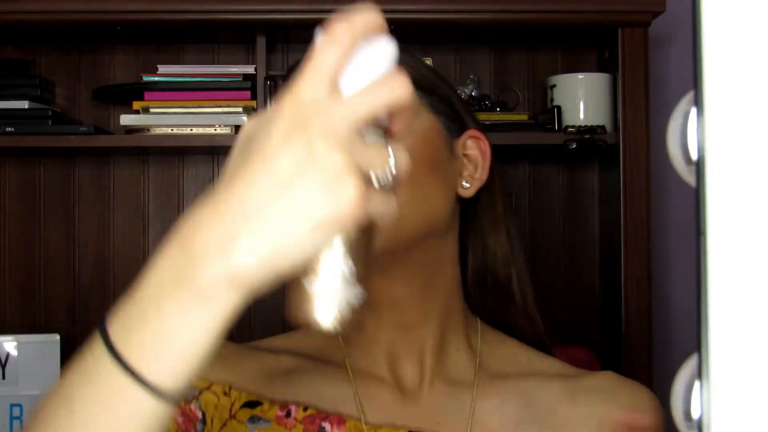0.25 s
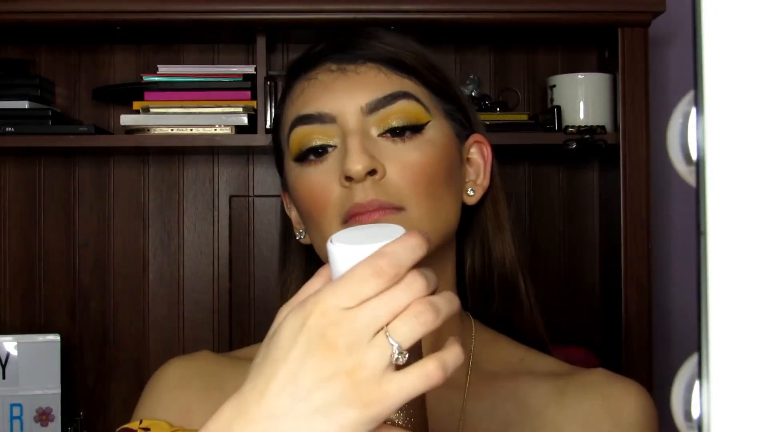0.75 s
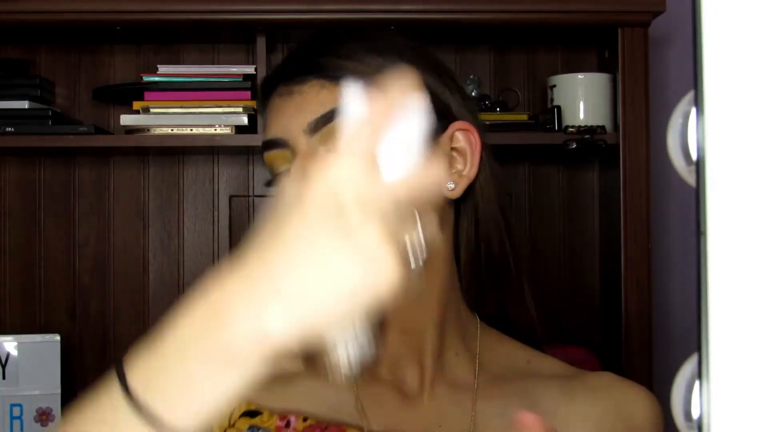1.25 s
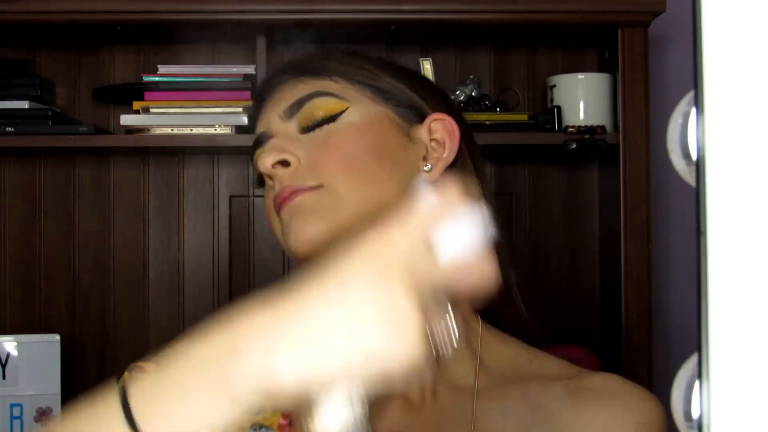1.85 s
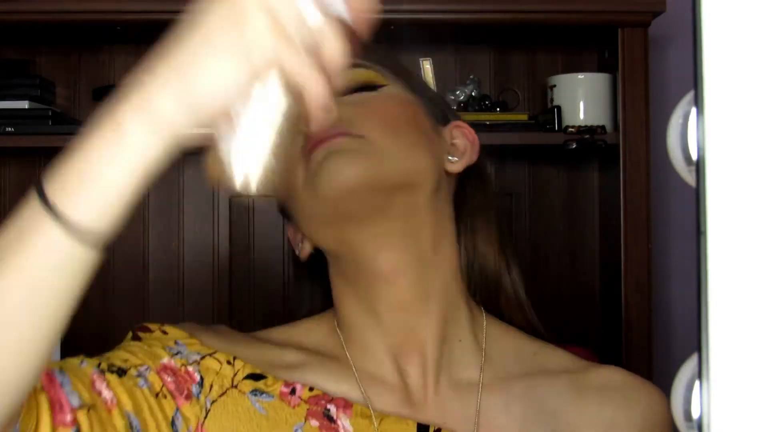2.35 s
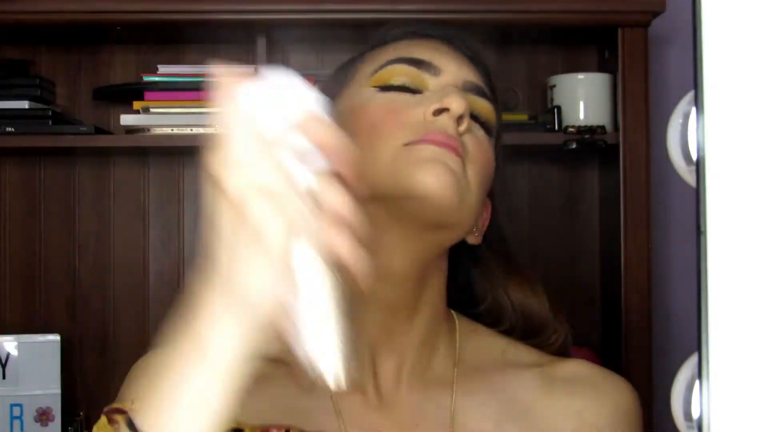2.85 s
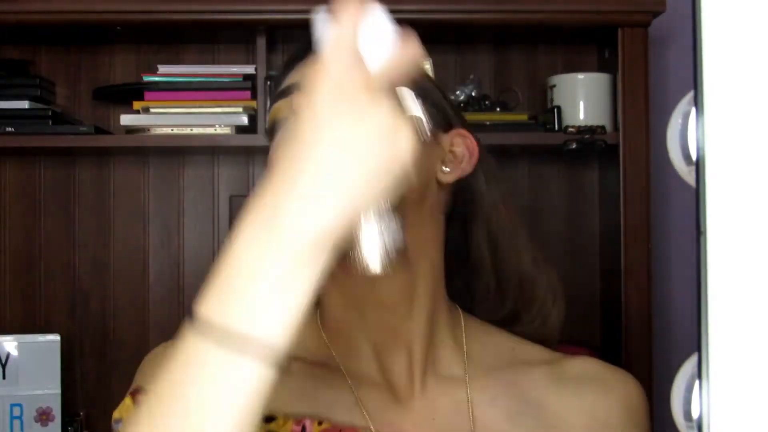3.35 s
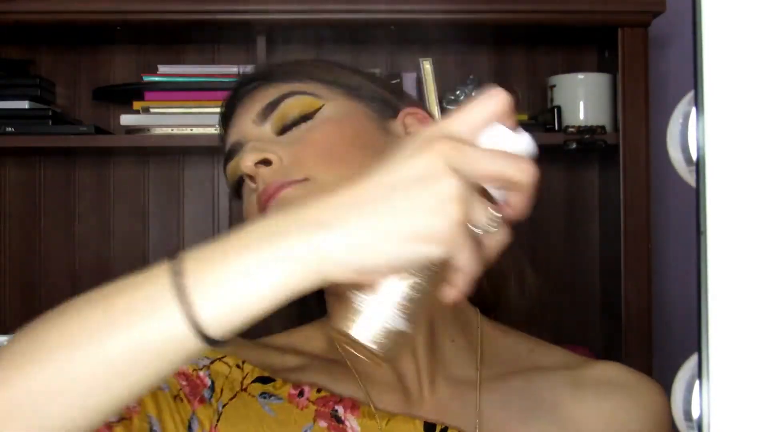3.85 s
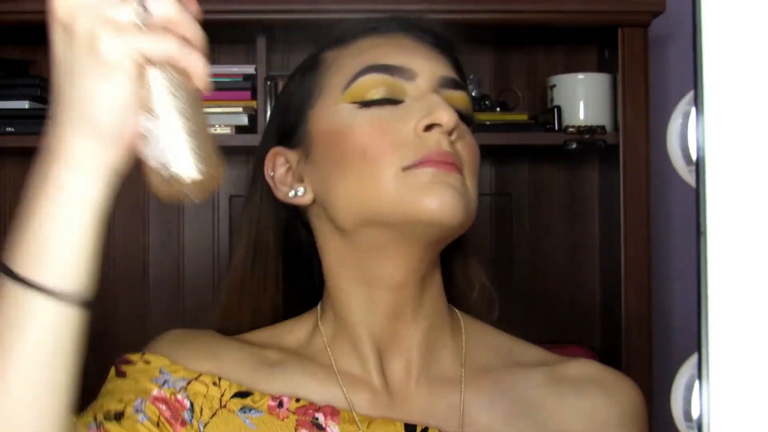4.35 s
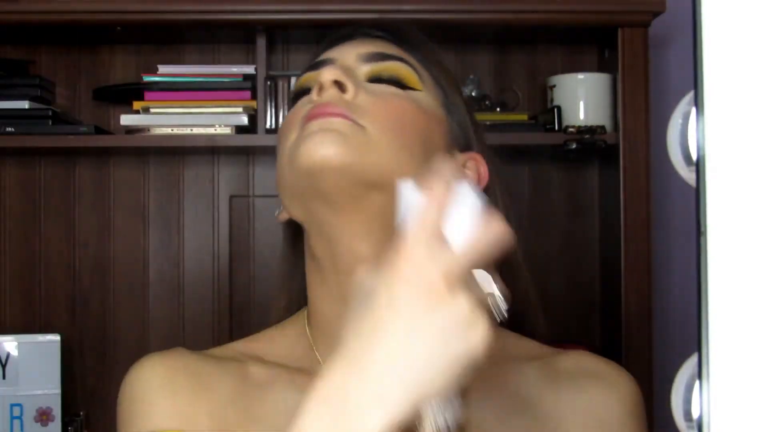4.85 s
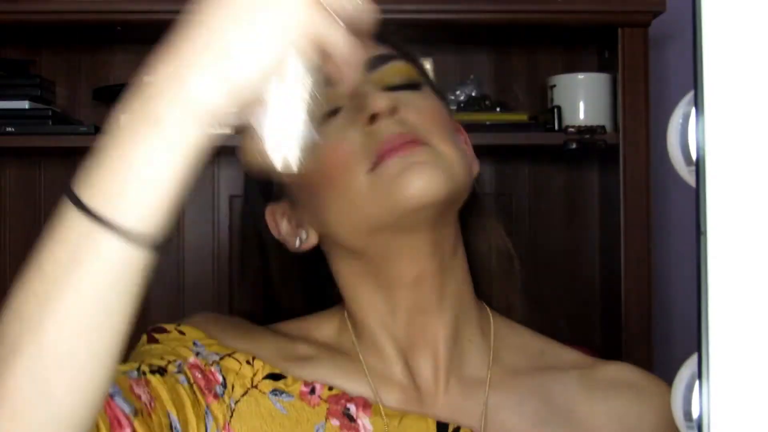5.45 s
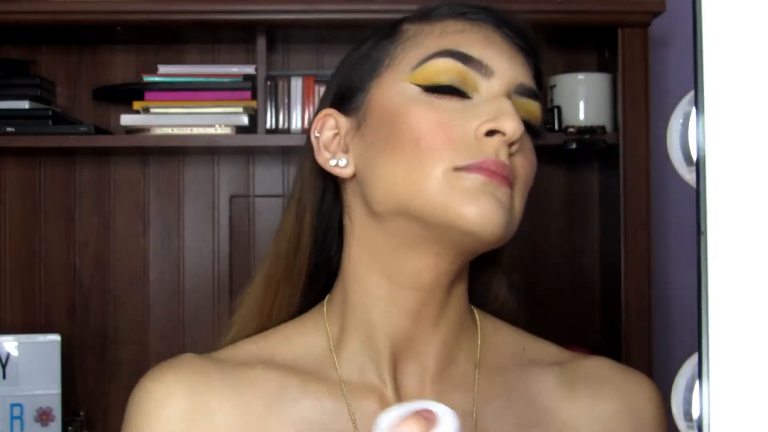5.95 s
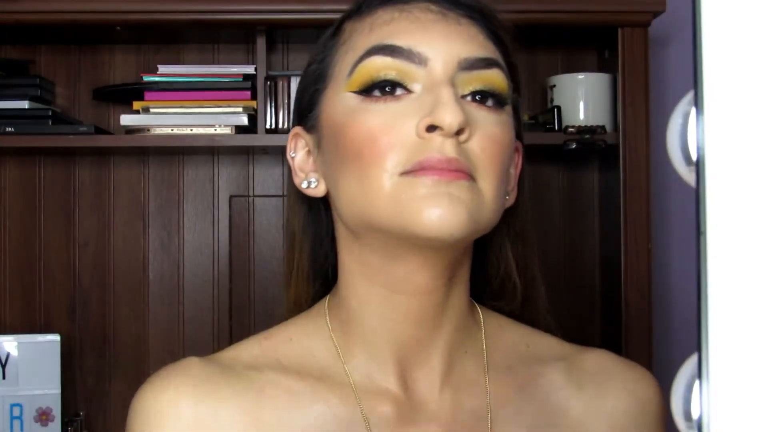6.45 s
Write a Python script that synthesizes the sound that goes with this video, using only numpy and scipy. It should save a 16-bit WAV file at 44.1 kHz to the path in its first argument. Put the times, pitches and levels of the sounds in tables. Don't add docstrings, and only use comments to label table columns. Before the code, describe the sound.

Close stereo pickup of a hand pump bottle indoors. First a sharp cap pop with a brief plastic chatter, then a rapid regular series of crisp misting bursts, each with a hollow knock before it and a softer airy draw after it. Some presses spit, judder or give a tiny rising whistle. It ends with a cap snap and light fumbling, over soft room rumble, preamp hiss and scratchy camera motor ticks.

```python
import sys
import numpy as np
from scipy import signal
from scipy.fft import rfft, irfft, next_fast_len
from scipy.io import wavfile

SR = 44100
rng = np.random.default_rng(int(sys.argv[2]) if len(sys.argv) > 2 else 0)


def unload_audio(sound):
    columns = np.transpose(np.atleast_2d(sound))
    steps = np.round(np.clip(columns, -1, 1) * 32767)
    wavfile.write(sys.argv[1], SR, steps.astype(np.int16))


def linear_from_db(decibels):
    return 10 ** (np.asarray(decibels, float) / 20)


N = 294915


def rms_one(x):
    return x / np.sqrt(np.mean(x ** 2) + 1e-20)


def band(x, low_hz, high_hz, order=2):
    return signal.sosfilt(signal.butter(order, [low_hz, high_hz], "band", fs=SR, output="sos"), x)


def coloured(x, points):
    hz = np.maximum(np.fft.rfftfreq(x.shape[-1], 1 / SR), 1)
    points = np.array(points)
    gain_db = np.interp(np.log(hz), np.log(points[:, 0]), points[:, 1])
    return irfft(rfft(x) * linear_from_db(gain_db), x.shape[-1])


def noise(points):
    return rms_one(coloured(rng.standard_normal(next_fast_len(N)), points)[:N])


def flutter(rate_hz):
    lowpass = signal.butter(2, rate_hz, fs=SR, output="sos")
    return rms_one(signal.sosfilt(lowpass, rng.standard_normal(N)))


def along(tables, column):
    rows = np.concatenate(tables)
    return np.interp(np.arange(N) / SR, rows[:, 0], rows[:, column])


def bursts(tables, fade_s=0.0027):
    rows = []
    for table in tables:
        rows.append((table[0][0] - fade_s, -110))
        rows += [row[:2] for row in table]
        rows.append((table[-1][0] + 6 * fade_s, -110))
    return linear_from_db(along([rows], column=1))


# pitch_hz, level_db (per Hz)
AIR_SUM = [(15, -45), (25, -10), (110, -2), (173, -3.5), (204, 0.5), (349, -7), (410, -0.5), (445, -9.5),
           (523, 1.5), (614, -7), (666, -21), (997, -12), (1270, -16.5), (3700, -27), (8350, -27.5),
           (15500, -33)]
# pitch_hz, level_db (per Hz)
AIR_DIFFERENCE = [(15, -51), (25, -2), (59, -4.5), (96, 1), (183, -0.5), (359, -4), (410, -9), (457, -4.5),
                  (703, -24), (945, -14.5), (1240, -24.5), (12800, -44.5), (15500, -38)]


def room_air():
    mid = linear_from_db(-48.5 + 1.15 * flutter(2.5)) * noise(AIR_SUM)
    side = linear_from_db(-41 + 0.64 * flutter(8.1)) * noise(AIR_DIFFERENCE)
    return mid, side


# peak_s, level_db, pitch_hz, half_length_s
GUSTS = [
    (2.55, -56, 100, .04),
    (4.68, -63, 45, .05),
    (5.66, -59, 50, .04),
    (5.78, -60, 55, .04),
    (5.3, -57, 300, .2),
]


def gusts():
    t, out = np.arange(N) / SR, np.zeros(N)
    for s, db, hz, half_s in GUSTS:
        lump = np.exp(-((t - s) / half_s) ** 2)
        out += linear_from_db(db) * lump * rms_one(band(rng.standard_normal(N), hz / 1.3, hz * 1.3))
    return out


# time_s, level_db
MOTOR_RUNS = [
    [(0.0, -57), (0.28, -75), (0.4, -71)],
    [(0.42, -62), (0.54, -71), (0.7, -82)],
    [(0.8, -57), (0.928, -57), (1.226, -60), (1.404, -55.5), (1.5, -78)],
    [(5.95, -69), (6.1, -55.5), (6.26, -76)],
    [(6.42, -63), (6.68, -72)],
]
# start_s, peak_db
JOLTS = [(0.008, -40), (0.018, -37), (0.056, -41), (0.075, -42), (0.09, -44), (0.108, -45), (0.46, -42),
         (0.466, -45.5), (0.5097, -48), (0.536, -38.5), (0.574, -39.5), (0.601, -39), (0.641, -40),
         (0.67, -36.5), (0.942, -56), (0.9562, -48), (0.975, -43), (0.984, -40), (1.1223, -44),
         (1.1444, -52), (1.1898, -43.5), (1.2082, -41), (1.257, -46), (1.276, -44), (1.3891, -40.5),
         (1.408, -42), (2.744, -32), (6.143, -38), (6.541, -38), (6.663, -30.5)]
# pitch_hz, width_hz, level_db
CAMERA_BODY = [(897, 110, -6), (1250, 54, 4.5), (1423, 110, 4), (1900, 310, -2.5), (2520, 320, -3.5)]


def motor():
    step_hz = 58.7
    turn = step_hz * np.arange(N) / SR
    strength = linear_from_db(rng.normal(0, 2.5, N // 100)[turn.astype(int)])
    steps = 0.24 + 2.16 * strength * np.exp(-5.0 * (turn % 1))
    drive = linear_from_db(0.5) * bursts(MOTOR_RUNS, fade_s=0.0046) * steps
    for s, db in JOLTS:
        drive[round(s * SR):][:600] += linear_from_db(db - 5.0) * np.exp(-np.arange(600) / SR / 0.0042)
    scratch, body = rng.standard_normal(N), 0
    both = np.array([scratch, scratch * drive])
    for k, (hz, width, db) in enumerate(CAMERA_BODY):
        body = body + (-1) ** k * linear_from_db(db) * band(both, hz - width / 2, hz + width / 2)
    return band(body[1], 750, 3400, order=4) / np.std(body[0])


# pitch_hz, t60_s
ROOM_T60 = [(300, 0.29), (1000, 0.26), (4000, 0.25), (12000, 0.15)]
# delay_s, level_db
ECHOES = [
    (.0057, -8),
    (.0085, -9),
    (0.014, -13),
    (.022, -14),
]


def room(x, echo_db, tail_db, count=3):
    t, out = np.arange(SR // 4) / SR, 0
    place = np.arange(N) // 3500 % count
    edges_hz = [60, 550, 2000, 7000, 18000]
    smear_s, echo_low_hz = 0.0018, 420
    for k in range(count):
        white, tail = rng.standard_normal((4, len(t))), 0
        for w, low, high, (hz, t60) in zip(white, edges_hz, edges_hz[1:], ROOM_T60):
            tail = tail + band(w, low, high) * linear_from_db(-60 * t / t60)
        onset = np.clip((t - .003) / 0.0084, 0, 1)
        tail = linear_from_db(tail_db) * tail / np.sqrt(np.sum(tail ** 2)) * onset
        for s, db in ECHOES:
            smear = rng.standard_normal(300) * np.exp(-t[:300] / smear_s)
            smear = band(smear, echo_low_hz, 22000)
            tail[round(s * SR):][:300] += linear_from_db(db + echo_db) * smear / np.sqrt(np.sum(smear ** 2))
        out = out + signal.oaconvolve(x * (place == k), tail)[:N]
    return out


SOFT_S, HARD_S = .0007, .0001


def add_ring(out, s, db, hz, t60, contact_s=HARD_S):
    t = np.arange(min(int(t60 * SR) + 8, N - round(s * SR))) / SR
    level = linear_from_db(db - 60 * (t / t60) ** 1.405) * np.minimum(t / contact_s, 1)
    out[round(s * SR):][:len(t)] += level * np.sin(2 * np.pi * hz * t)


def crack(colour, spread_s):
    pulse = np.zeros(2048)
    pulse[0] = 1
    cepstrum = irfft(np.log(np.abs(rfft(coloured(pulse, colour))) + 1e-6))
    cepstrum[1:1024] *= 2
    cepstrum[1025:] = 0
    lag_s = spread_s * np.interp(np.arange(1025), np.geomspace(20, 1024, 22), rng.random(22))
    pulse = irfft(np.exp(rfft(cepstrum) - 2j * np.pi * np.cumsum(lag_s) * SR / 2048))
    return pulse / np.abs(pulse).max()


# start_s, peak_db
SNAPS = [
    (0.7114, -17),
    (6.2719, -14.5),
]
# pitch_hz, level_db (per Hz)
CAP_OFF = [(500, -42.5), (700, -7), (900, 11), (1400, 0), (1700, -7), (2150, 3.5), (2700, -5), (3200, 3),
           (4000, -18), (4600, -9), (5600, -22), (8700, -10), (10500, -14), (15500, -18)]
# pitch_hz, level_db (per Hz)
CAP_ON = [(500, -45), (780, -34), (1010, -4), (1200, -7), (1520, 6), (1900, -8), (2300, -11.5), (2900, -3),
          (3700, -12), (4500, -13), (7000, -11), (9800, -11), (12000, -22), (15500, -21)]
# pitch_hz, width_hz, level_db
CHATTER_OFF = [(880, 25, -6), (1070, 41, 1.5), (1590, 73, 1), (2340, 91, -9), (3040, 110, -3.5),
               (3840, 84, 0), (6500, 140, -6), (8800, 140, 0.5), (9800, 90, -9)]
# pitch_hz, width_hz, level_db
CHATTER_ON = [(1000, 60, -11), (1320, 69, -3.5), (1580, 65, -4), (2130, 140, -7.5), (2930, 140, -9),
              (3700, 77, -4.5), (5950, 170, -15), (7040, 150, -19), (9360, 150, -6), (10270, 120, -8)]
# pitch_hz, level_db (re the snap), t60_s
STRUCK_OFF = [(860, -16.5, 0.053), (1700, -12, .02), (2150, 3.5, 0.0066), (3120, -13, .006),
              (4400, -7, .006)]
# pitch_hz, level_db (re the snap), t60_s
STRUCK_ON = [(1000, -16.5, 0.018), (1250, -9, 0.018), (1525, -8, 0.048), (2000, -13, .015),
             (3030, -18, 0.0066), (5170, -10, 0.0067)]


def cap():
    out, t = np.zeros(N), np.arange(SR // 4) / SR
    chatter_db, chatter_t60_s, spread = -17.5, 0.095, 4
    sides = zip(SNAPS, (CAP_OFF, CAP_ON), (CHATTER_OFF, CHATTER_ON), (STRUCK_OFF, STRUCK_ON))
    for (s, db), colour, modes, struck in sides:
        for hz, mode_db, t60 in struck:
            add_ring(out, s + 0.00087, db + mode_db, hz, t60)
        for lag_s, part_db in ((.0006, 2), (.0024, -0.5), (.005, -9.5)):
            out[round((s + lag_s) * SR):][:2048] += linear_from_db(db + part_db) * crack(colour, spread_s=.0022)
        chatter, rings = rng.standard_normal(len(t)), 0
        top_db = max(row[2] for row in modes)
        for hz, width, mode_db in modes:
            half_hz = spread * width / 2
            rings = rings + linear_from_db(mode_db - top_db) * rms_one(band(chatter, hz - half_hz, hz + half_hz))
        out[round((s + .001) * SR):][:len(t)] += linear_from_db(db + chatter_db - 60 * t / chatter_t60_s) * rings
    return out


def blows(events, overtone, overtone_db, rattle_db, contact_s=HARD_S):
    out, rattle = np.zeros((2, N))
    rattle_fall_db = 60 * np.arange(700) / SR / 0.057
    for (s, db, hz, t60), chance in zip(events, rng.normal(0, 1, (len(events), 2))):
        s, t60 = s + 0.00059, max(t60, .002)
        wall_db = db + overtone_db + 1.2 * chance[0]
        wall_hz = overtone * hz * (1 + 0.1 * chance[1])
        add_ring(out, s, db, hz, t60, contact_s)
        add_ring(out, s + 0.00029, wall_db, wall_hz, 0.83 * t60, contact_s)
        rattle[round(s * SR):][:700] += linear_from_db(db + rattle_db - rattle_fall_db)
    return out + rattle * rms_one(band(rng.standard_normal(N), 820, 1960))


# start_s, peak_db, t60_s
THUDS = [(1.9068, -28.5, 0.0098), (2.284, -27, 0.011), (2.6378, -25.5, 0.011), (2.9865, -24, 0.007),
         (3.2955, -25.5, 0.0065), (3.637, -26.5, 0.0086), (3.959, -25, 0.0057), (4.233, -24, 0.012),
         (4.5776, -26, 0.0074), (4.8607, -26, 0.0072), (5.7152, -30, 0.0083)]
# start_s, peak_db, pitch_hz, t60_s
TICKS = [(1.022, -40, 3250, .004), (1.128, -48, 5700, 0.0056), (5.78, -45, 4360, 0.0099),
         (6.082, -49, 1900, 0.0046), (6.115, -46, 3400, 0.0033), (6.147, -58, 2150, 0.0064),
         (6.2, -37, 3930, 0.0038), (6.454, -42, 2860, 0.0041), (6.47, -54, 2300, .005),
         (6.52, -47, 2000, .005), (6.545, -48, 2170, 0.0022), (6.58, -42, 2390, 0.0022),
         (6.652, -42, 1920, 0.0033), (6.666, -40, 2300, 0.0039)]
# start_s, peak_db, hollow_hz
LANDINGS = [(1.688, -31.5, 1110), (2.0768, -24.5, 1120), (2.4422, -24, 1115), (2.797, -31, 1120),
            (3.12, -32, 1080), (3.437, -31.5, 1120), (3.7552, -32, 1140), (4.074, -29.5, 1050),
            (4.079, -32, 1205), (4.39, -35.5, 1100), (5.243, -29.5, 1118), (5.5336, -32, 1000)]
# start_s, peak_db, hollow_hz
REFILLS = [(1.957, -27, 840), (1.963, -27, 1110), (2.329, -24.5, 950), (2.6812, -17, 1134),
           (2.692, -36, 1100), (2.699, -32, 1370), (2.703, -38, 1370), (2.717, -40, 1200),
           (2.725, -42, 1250), (2.737, -49, 1160), (2.745, -44, 1210), (2.757, -43, 1210),
           (3.685, -31.5, 1110), (3.999, -21.5, 1004), (4.286, -31, 1030), (4.6235, -27, 880),
           (4.9035, -26.5, 842), (5.153, -29.5, 880), (5.41, -34, 886), (5.462, -31, 570),
           (5.739, -35, 645), (5.772, -40, 712)]
# start_s, peak_db, hollow_hz
JUDDERS = [(2.812, -17.5, 1000), (2.82, -23, 920), (2.8275, -25, 970), (2.835, -26, 1360),
           (2.822, -27, 420), (2.842, -26, 1250), (2.843, -29, 433), (4.7, -31, 705.6), (4.711, -20, 853),
           (4.7185, -24, 1150), (4.721, -24.5, 1000), (4.73, -28.5, 420), (4.9876, -18.5, 930),
           (4.9935, -22, 1074), (4.9962, -23.5, 810), (4.999, -19, 520), (5.007, -21, 1083),
           (5.014, -25.5, 915), (5.018, -32, 1050), (5.044, -28, 530)]
# start_s, peak_db, hollow_hz
GRIPS = [(1.022, -32.5, 830), (5.109, -37, 895), (5.12, -42, 1000), (5.132, -48, 890), (6.174, -34.5, 980),
         (6.2, -36, 1070), (6.434, -32.5, 990), (6.453, -33, 1080), (6.467, -44, 1160), (6.518, -42, 1440),
         (6.53, -42, 1000), (6.549, -42, 1290), (6.572, -40, 970)]


def pump_head():
    thuds = [(s, db, 500, t60) for s, db, t60 in THUDS]
    edges = [(s, db - 14, 1850, .004) for s, db, t60 in THUDS]
    kinds = ((LANDINGS, .011), (REFILLS, .011), (JUDDERS, .008), (GRIPS, .01))
    knocks = [(*row, t60) for table, t60 in kinds for row in table]
    out = blows(thuds, 2.11, -1.0, -16.0)
    out = out + blows(edges, 1.4, -15.0, -16.0)
    out = out + blows(knocks, 1.97, -23.0, -19.0, SOFT_S)
    out = out + blows(TICKS, 1.01, -25, -7.5)
    return band(out, 180, 7900)


def whistle(hz, width_hz):
    return flutter(width_hz) * np.cos(2 * np.pi * np.cumsum(hz) / SR)


def lingering(gain, wet_db):
    hiss_t60_s = 0.25
    r = linear_from_db(-120 / (hiss_t60_s * SR))
    return np.sqrt(gain ** 2 + linear_from_db(2 * wet_db) * signal.lfilter([1 - r], [1, -r], gain ** 2))


# pitch_hz, level_db (per Hz)
RUSH = [(470, -83), (800, -8.5), (985, -3), (1610, -2.5), (2140, 0.5), (2980, -4.5), (3600, -14),
        (4680, -20), (7920, -120)]


def hiss(top, low, high, patchy_db):
    shared = flutter(53)
    bright = linear_from_db(patchy_db * (shared + flutter(380))) * top * noise(high)
    return bright + linear_from_db(patchy_db * (shared + flutter(99))) * low * noise(RUSH)


# peak_s, rise_s, fall_s, hiss_db, rush_db (re hiss)
DRAWS = [(1.968, 0.027, 0.038, -38, 0), (2.337, 0.035, 0.028, -42.5, 3.5), (2.687, 0.056, .03, -44, -2),
         (3.024, 0.025, 0.07, -49, 6.5), (3.345, 0.042, 0.025, -44, 1.5), (3.691, 0.038, .03, -43, -4.5),
         (4.01, 0.037, 0.024, -40.5, -5), (4.276, 0.038, 0.019, -42, 2), (4.632, 0.04, 0.027, -43.5, 0),
         (4.914, 0.042, 0.036, -44, 1), (5.161, 0.028, 0.036, -41, 0.5), (5.449, 0.014, 0.047, -43.5, 1),
         (5.775, 0.042, 0.034, -48.5, -3)]
# peak_s, rise_s, fall_s, hiss_db, rush_db (re hiss)
SLIDES = [
    (6.201, .006, 0.02, -56, 9),
    (6.264, 0.043, 0.027, -48, 4),
    (6.45, 0.17, 0.026, -61, 8.5),
]
# pitch_hz, level_db (per Hz)
SUCK = [(2060, -24), (3500, -5), (5650, 1), (7530, -3), (8370, 2.5), (11000, -1.5), (13500, -9),
        (15500, -10)]


def draw_shape(s, rise_s, fall_s, db, rush_db):
    weak_rush_db = rush_db + 3.5
    return [(s - rise_s, db - 13, weak_rush_db), (s, db, rush_db), (s + fall_s, db - 14, weak_rush_db)]


def suction(wet_db):
    draws = [draw_shape(*row) for row in DRAWS + SLIDES]
    suck = bursts(draws, fade_s=0.0015)
    rush = lingering(suck * linear_from_db(along(draws, column=2)), wet_db)
    flow = hiss(linear_from_db(-2.5) * lingering(suck, wet_db), linear_from_db(-6.5) * rush, SUCK, patchy_db=2.5)
    return flow + linear_from_db(-13.5) * rush * whistle(np.full(N, 2266), 210)


# start_s, length_s, level_db, first_hz, last_hz
POCKETS = [
    (2.331, 0.01, -41, 5300, 5450),
    (2.655, .045, -47, 1700, 2450),
    (2.825, .082, -42, 2343, 4900),
    (3.654, 0.036, -49, 1962, 2330),
    (3.971, .035, -47, 1950, 2553),
    (4.729, 0.067, -44, 1795, 3590),
]


def air_pockets(wet_db):
    pockets = []
    for s, length_s, db, first_hz, last_hz in POCKETS:
        pockets.append([(s, db, first_hz), (s + length_s, db, last_hz)])
    return lingering(bursts(pockets), wet_db) * whistle(along(pockets, column=2), 250)


# start_s, peak_db
SPITS = [(1.6863, -21), (1.699, -14), (1.955, -29), (2.1064, -19), (2.336, -16), (2.474, -29), (2.811, -13),
         (2.8185, -7.5), (3.14, -30), (3.1554, -30), (3.4731, -33), (3.689, -27), (3.7903, -18),
         (4.0023, -30), (4.076, -22), (4.082, -15), (4.091, -27), (4.4223, -19), (4.71, -15), (4.988, -7),
         (5.2678, -34), (5.437, -28), (5.534, -21.5), (5.554, -27)]


def valve_spits(wet_db):
    spit, t = np.zeros(N), np.arange(2000) / SR
    for s, db in SPITS:
        spit[round(s * SR):][:2000] += linear_from_db(db - 21 - 60 * t / 0.028)
    return lingering(spit, wet_db) * rms_one(band(rng.standard_normal(N), 4500, 15000))


# start_s, full_pressure_after_s, length_s, hiss_db, chamber_hz
PRESSES = [(1.697, 0.053, .12, -33, 2700), (2.105, 0.06, 0.12, -32.5, 2870),
           (2.467, 0.063, 0.12, -31, 2880), (2.808, 0.082, 0.15, -34.5, 2650),
           (3.15, 0.055, 0.12, -31.5, 2150), (3.472, 0.044, 0.12, -32, 2600),
           (3.786, 0.04, 0.13, -32.5, 2800), (4.098, 0.073, 0.12, -31.5, 2840),
           (4.422, 0.076, .118, -32.5, 2400), (4.709, 0.071, 0.14, -33, 2600),
           (4.986, 0.031, 0.12, -33.5, 2436), (5.265, 0.029, 0.12, -33, 2626),
           (5.559, 0.018, 0.12, -31, 2520)]
# pitch_hz, level_db (per Hz)
JET = [(2060, -16.5), (3500, -4.5), (3750, -4.5), (4960, -4.5), (5510, -4.5), (10500, -4.5), (14500, -13),
       (15500, -6)]


def press_shape(s, full_s, length_s, db, hz):
    open_s, close_s = 0.017, .04
    times = s + np.array([0, open_s, full_s, max(length_s - close_s, full_s + 0.0043), length_s])
    slack_db = np.array([-12.5, -3, 0, -5, -23])
    rush_follows = 0.43
    rush_db = np.append(-8.5 - (1 - rush_follows) * slack_db[:-1], -10.5)
    chamber_hz = hz + 18 * slack_db
    return np.transpose([times, db + slack_db, rush_db, chamber_hz]).tolist()


def spray_jet(wet_db):
    spray = [press_shape(*row) for row in PRESSES]
    jet = bursts(spray, fade_s=0.001)
    rush = lingering(jet * linear_from_db(along(spray, column=2)), wet_db)
    chamber = whistle(along(spray, column=3), 230)
    flow = hiss(linear_from_db(1.0) * lingering(jet, wet_db), linear_from_db(-0.5) * rush, JET, patchy_db=0.7)
    return flow + linear_from_db(-3.5) * rush * chamber


def mist(wet_db):
    return spray_jet(wet_db) + air_pockets(wet_db) + valve_spits(wet_db) + suction(wet_db)


# pitch_hz, level_db (re sum)
WIDTH = [(100, 4), (400, -3.5), (800, -11), (1500, -9), (2500, -66), (4500, -22), (8000, -8), (14000, -5.5)]


def scene():
    pump, snaps, spray = pump_head(), cap(), mist(wet_db=-8.0)
    to_room = snaps + linear_from_db(0.5) * pump + linear_from_db(-8.0) * spray
    mid = spray + pump + snaps + room(to_room, 0, -3.0) + motor()
    knocks = pump + snaps
    wide = mist(wet_db=0.0) + 0.37 * np.roll(knocks, 3) + room(knocks, -0.98, -0.32)
    side = coloured(wide, WIDTH) + 0.072 * mid
    air_mid, air_side = room_air()
    mid = mid + air_mid + gusts()
    side = side + air_side + 1.8 * gusts()
    return np.array([mid - side, mid + side])


def band_limit(x):
    return signal.sosfilt(signal.butter(12, 16360, fs=SR, output="sos"), x)


def record(dry):
    steep = signal.cheby2(20, 75, 15350, fs=SR, output="sos")
    mix = signal.sosfilt(steep, dry)
    return band_limit(mix)


dry = scene()
out = record(dry)
unload_audio(out)
```